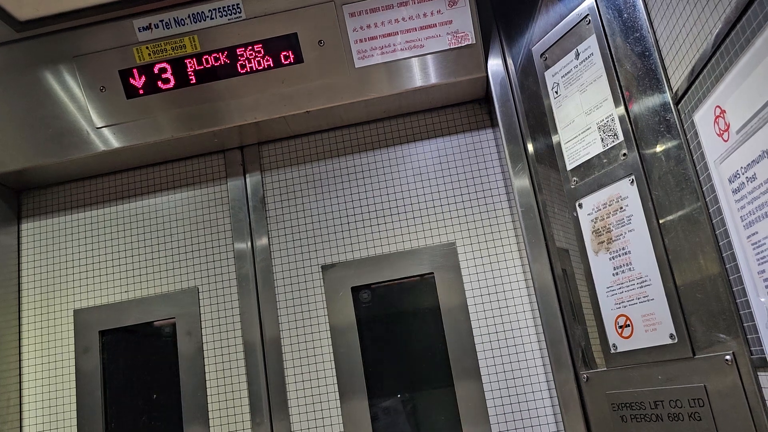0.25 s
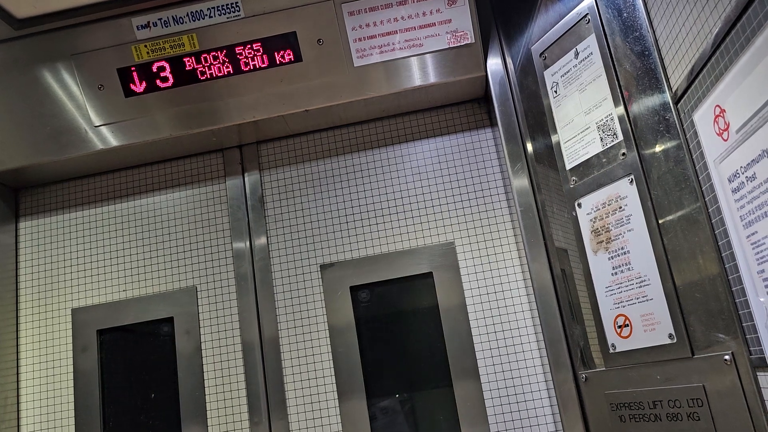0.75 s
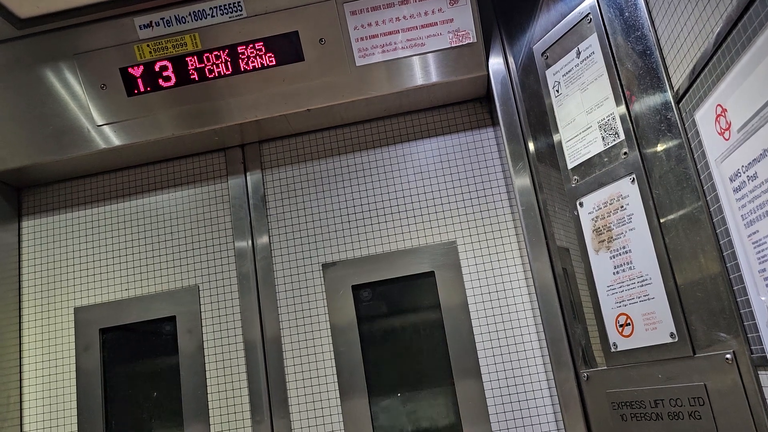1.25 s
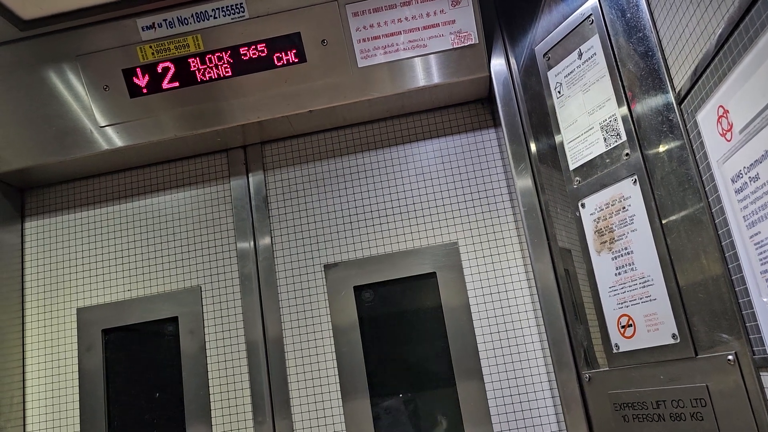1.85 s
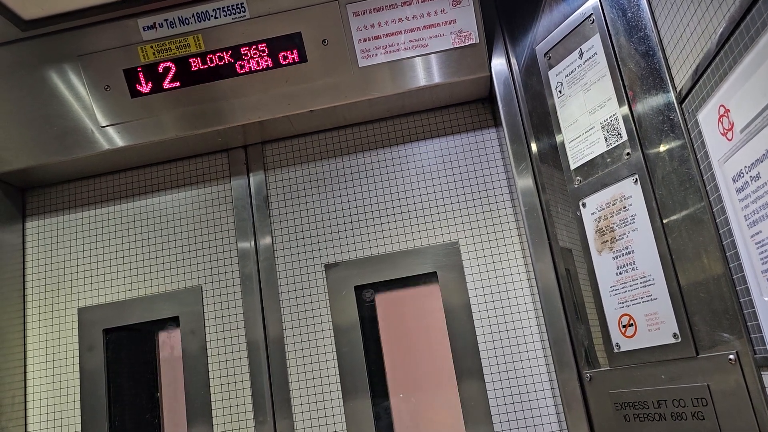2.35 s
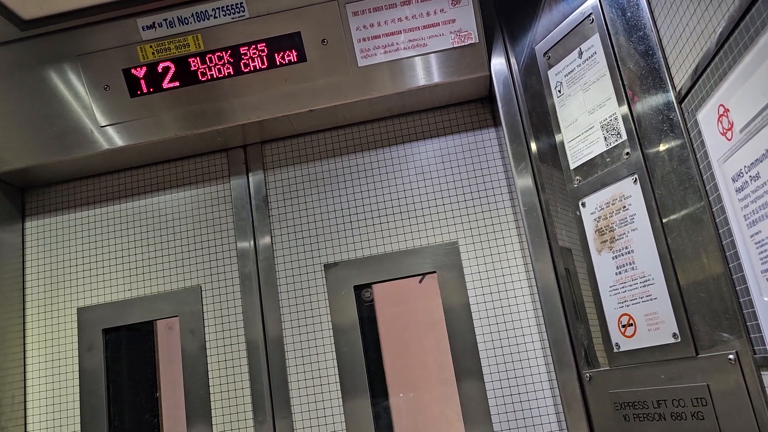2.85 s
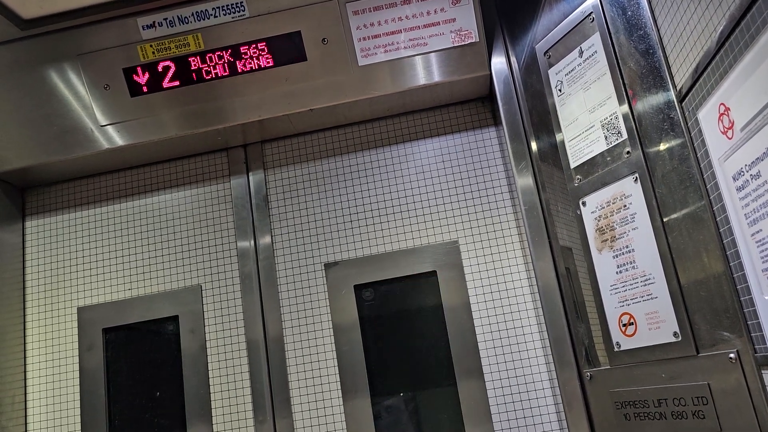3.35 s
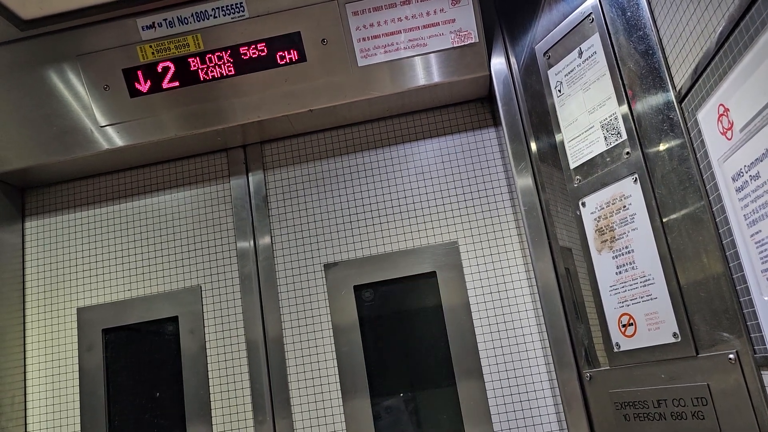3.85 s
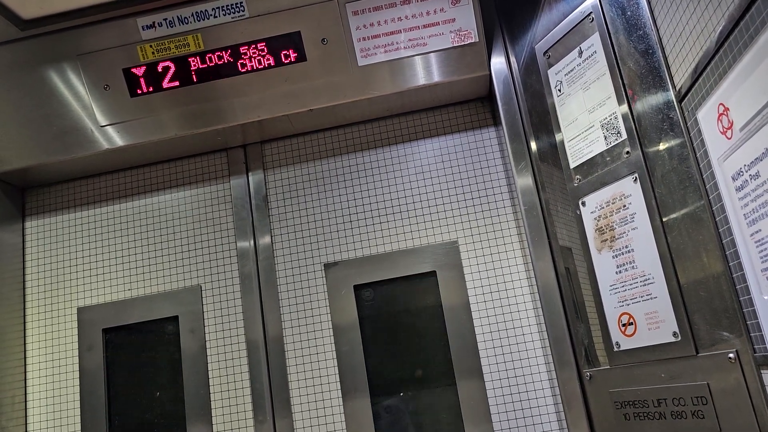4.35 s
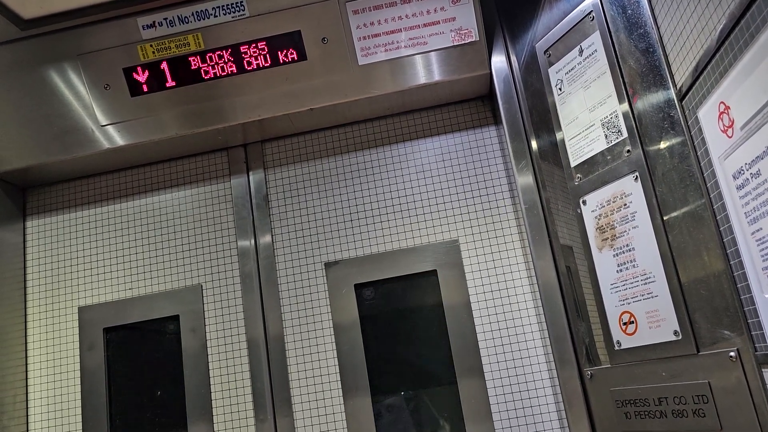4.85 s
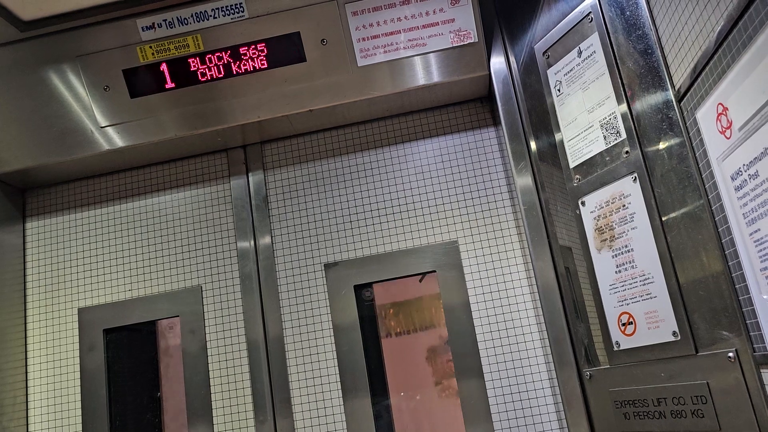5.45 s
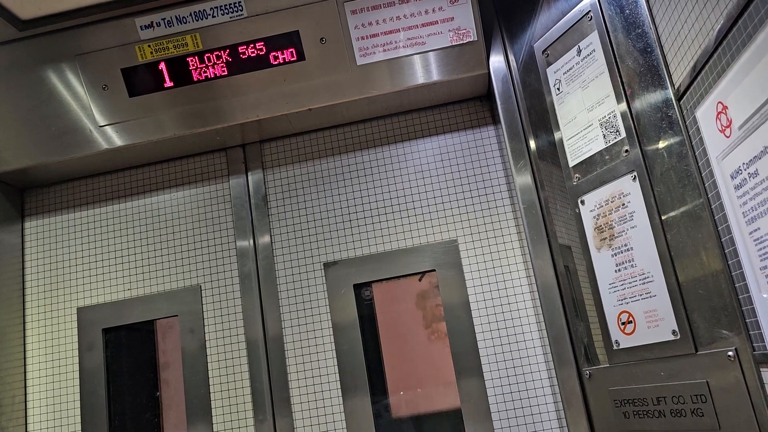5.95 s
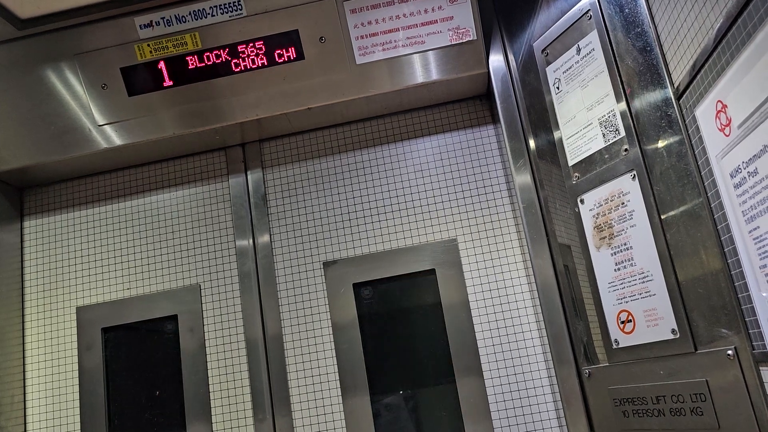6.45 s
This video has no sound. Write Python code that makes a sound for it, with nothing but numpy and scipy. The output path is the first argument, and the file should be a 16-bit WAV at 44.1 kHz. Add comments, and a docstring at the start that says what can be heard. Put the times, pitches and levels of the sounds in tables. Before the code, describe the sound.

Heard inside a small steel passenger lift going down: a steady deep hum with slow throbbing, mains buzz, boxy rumble and a faint fan hiss. A small bright relay tick comes early, then two metallic switch clacks in quick succession, the first louder with a low panel boom. The hum grows stronger, and a very faint high squeal appears near the end. Close, enclosed stereo.

```python
"""Inside a small steel passenger lift on its way down. The winding machine drones through the ropes as beating
sines; the mains hum is a set of even harmonics. Filtered noise gives the ride rumble, ringing in the air modes
of the car, and the hiss of the ceiling fan. A relay ticks, then a shaft switch clacks twice as a landing goes by:
noise bursts with a reverberant decay, the first booming in the panels. Near the bottom a guide shoe starts to
sing faintly, on an unsteady sine."""
import sys
import numpy as np
from scipy import signal
from scipy.fft import rfft, irfft
from scipy.io import wavfile

SR = 44100
rng = np.random.default_rng(int(sys.argv[2]) if len(sys.argv) > 2 else 0)


def put_to_file(sound):
    """Save the sound as 16-bit audio at rate SR, in the file named by the first command-line argument."""
    columns = np.atleast_2d(sound).T  # one column per channel
    safe = np.clip(columns, -1, 1)
    whole_steps = np.round(safe * 32767)
    wavfile.write(sys.argv[1], SR, whole_steps.astype(np.int16))


N = 295470
TIME = np.arange(N) / SR  # s
HZ = np.maximum(np.arange(N // 2 + 1) * SR / N, 1)  # spectrum axis, kept above zero for logarithms
ACROSS = np.array([[1], [-1]])  # opposite signs at left and right

# Densities are mean square per Hz, in dB re full scale squared per Hz.
# Lateral balance of ride and fan noise: f/Hz, left minus right/dB
STEADY_BALANCE = [(60, -0.5), (90, 1.5), (130, 0), (200, 0.5), (300, -5), (440, 0), (660, 2), (990, 0),
                  (1480, -3), (2210, 0), (3300, -1), (4920, 0)]
# Shaft tones, before the load changes them: f/Hz, rms level/dB
SHAFT_TONES = [(22.8, -40.5), (29.4, -42), (45.7, -51), (182.4, -59)]
# Stronger tone of the machine's drone, before its waver: t/s, rms level/dB
DRONE_LEVEL = [(0, -43.5), (2.7, -42), (3.9, -38.5), (5.4, -36.5), (6.7, -37.5)]
# Mains hum, before its waver: multiple of the mains, level in the middle/dB, level across the car/dB
HUM_HARMONICS = [(2, -41, -65), (4, -55, -70), (6, -71.5, -64.5)]
# Broad ride noise, common to both sides and opposed across the car: f/Hz, density/dB
RUMBLE_COMMON = [(15, -80), (20, -57.5), (55, -62), (68, -61), (92, -58.5), (110, -76.5), (230, -78.5),
                 (285, -82.5), (560, -82), (850, -85.5), (960, -89), (1500, -90), (2000, -99.5),
                 (2600, -110)]
RUMBLE_ACROSS = [(15, -84), (90, -81.5), (115, -88.5), (235, -89), (280, -85.5), (640, -87), (1100, -91),
                 (1800, -92), (2200, -100.5), (2800, -112)]
# Standing waves of the car, common and opposed: f/Hz, width/Hz, density at the peak/dB
CAR_MODES = [(130, 14, -66.5), (152.2, 8.9, -59), (170.6, 3.3, -64), (180, 12, -71), (206.5, 9.7, -63),
             (218.5, 7.8, -66.5), (251.6, 10, -67), (269.9, 7.9, -67), (310.4, 19, -72), (377.8, 24, -74),
             (455.7, 17.4, -74.5), (523.8, 13, -74.5), (610, 60, -83), (746.7, 17, -78.5), (798.7, 13, -78),
             (887.4, 15.4, -81), (990, 17, -83.5), (1050, 10.5, -83.5), (1214, 25, -86), (1344, 25, -85),
             (1609, 23, -85)]
CROSS_MODES = [(395, 25, -83), (508, 11, -76.5), (734, 32, -81), (860, 60, -88), (923, 33, -79.5),
               (1230, 18, -79), (1310, 50, -85), (1500, 79, -85), (1730, 17, -96)]
# Vent hiss, before the spectral ripple: f/Hz, density/dB
FAN_HISS = [(800, -115), (2150, -97), (2450, -100.5), (3000, -99), (3500, -104), (4500, -108),
            (5200, -117.5), (6000, -129), (9500, -142), (11500, -132), (12300, -136), (16000, -135)]
# Relay tick, before its envelope: f/Hz, density/dB
RELAY_TICK = [(3000, -130), (5600, -114), (7000, -116), (7900, -105), (9000, -122), (11000, -108),
              (13000, -112), (16000, -121)]
# Landing switch: t/s, relative level/dB, relative level of the low body/dB
CLACKS = [(2.6491, 0.5, -5), (2.9446, -3.5, -13.5)]
# Crack and dull body of a clack, before the relative levels: f/Hz, density/dB
CLACK_CRACK = [(1000, -105), (2600, -92.5), (4200, -87), (6200, -100), (7000, -100), (8700, -102),
               (9600, -109), (11000, -105), (13500, -104), (16000, -110)]
CLACK_BODY = [(130, -69), (300, -59.5), (400, -73), (520, -65.5), (900, -87), (1400, -74), (2000, -87),
              (3000, -100)]
# Ring of the switch lever and its bracket, before the relative levels: f/Hz, width/Hz, density at the peak/dB
LEVER_MODES = [(2090, 150, -82.5), (2694, 250, -80), (3105, 190, -76), (3534, 240, -75), (4370, 200, -84.5),
               (5470, 230, -90), (7600, 400, -100), (11150, 720, -102)]
# Lateral balance of relay and switch: f/Hz, left minus right/dB
SWITCH_BALANCE = [(600, 2), (1800, -1.5), (3300, 2.5), (4200, -3), (5000, 0.5), (6200, 8), (8000, 8.5),
                  (10500, 1), (13500, 5)]
# Reverberation of the car: f/Hz, time to decay by 60 dB/s
CAR_T60 = [(300, 0.56), (1500, 0.82), (3500, 0.44), (7000, 0.26), (15000, 0.26)]

DRONE_HZ, MAINS_HZ, SQUEAL_HZ, CUTOFF_HZ = 58.7, 50, 2676, 15750
# A weaker tone above the drone beats with it; the two are in step at the crest
BEAT_HZ, BEAT_CREST_S, BEAT_TONE_DB = 1.68, 5.24, -7.5
RELAY_S, SWITCH_GAIN_DB = 1.565, 0.06
SQUEAL_START_S, SQUEAL_ATTACK_S, SQUEAL_DB, SQUEAL_FADE_DB_PER_S = 5.55, 0.06, -70, 2
GRIPS_PER_S, GRIP_SWELL_DB, GRIP_SETTLE_S = 5.7, 4.0, 0.9


def from_db(db):
    """Amplitude ratio: a level of 20 dB is a factor of ten."""
    return 10 ** (np.asarray(db) / 20)


def at_hz(points, hz):
    """Logarithmic pitch scale: interpolate a table against log frequency."""
    f, value = np.transpose(points)
    return np.interp(np.log(hz), np.log(f), value)


def colour(spectrum, modes=()):
    """Power addition: resonances stand on a broad slope, which falls 40 dB per octave past its ends."""
    octaves_outside = np.abs(np.log2(HZ / np.clip(HZ, spectrum[0][0], spectrum[-1][0])))
    power = from_db(at_hz(spectrum, HZ) - 40 * octaves_outside) ** 2
    for hz, width, db in modes:
        detuning = (HZ - hz) / width
        power = power + from_db(db) ** 2 / (1 + 2 * detuning ** 2) ** 2
    return np.sqrt(power)


def noise(gain):
    """Spectral shaping: white noise filtered to the given amplitude per root Hz."""
    return irfft(rfft(rng.standard_normal(N)) * gain, N) * np.sqrt(SR / 2)


def drift(rate_hz):
    """Slow random fluctuation: low-passed noise scaled to a standard deviation of 1."""
    slow = noise(1 / (1 + (HZ / rate_hz) ** 2) * (HZ > 1))
    return slow / np.std(slow)


def tone(hz, waver_db, wander_hz, rate_hz=3):
    """Random modulation: a sine of nominal rms 1 wavers in level and wanders in pitch."""
    turns = np.cumsum(hz + wander_hz * drift(rate_hz)) / SR + rng.random()
    return np.sqrt(2) * np.sin(2 * np.pi * turns) * from_db(waver_db * drift(rate_hz))


def beating_pair(waver_db, wander_hz, rate_hz=3):
    """Beats: two close tones, wandering together, reinforce and oppose each other in turn."""
    turns = np.cumsum(DRONE_HZ + wander_hz * drift(rate_hz)) / SR + rng.random()
    lead = BEAT_HZ * (TIME - BEAT_CREST_S)
    drone = np.sin(2 * np.pi * turns)
    neighbour = from_db(BEAT_TONE_DB) * np.sin(2 * np.pi * (turns + lead))
    return np.sqrt(2) * (drone + neighbour) * from_db(waver_db * drift(rate_hz))


def off_centre(x, balance):
    """Level difference between the sides: a sound favours left or right according to frequency."""
    return irfft(rfft(x) * from_db(ACROSS * at_hz(balance, HZ) / 2), N)


def strike(s, gain, rise_s, hold_s, grain_db=1.0):
    """Reverberation: a knock's uneven echoes pile up, hold, then decay at a rate set by frequency."""
    start, size = int(s * SR), SR // 2
    age = np.arange(size) / SR
    sides = [(noise(gain) * from_db(grain_db * drift(250)))[:size] for _ in range(2)]
    echoes = rfft(sides)
    hz = np.maximum(np.arange(echoes.shape[1]) * SR / size, 1)
    out = np.zeros((2, N))
    for centre, t60 in CAR_T60:
        # each band fades into its neighbours, so that the shares add to 1
        share = at_hz([(f, float(f == centre)) for f, _ in CAR_T60], hz)
        decay = from_db(-60 * np.maximum(age - hold_s, 0) / t60)
        envelope = np.minimum(age / rise_s, 1) * decay
        out[:, start:start + size] += irfft(echoes * share, size) * envelope
    return out


def machine():
    """Structure-borne sound: shaft tones and a beating drone come down the ropes, growing on the descent."""
    drone_db = np.interp(TIME, *np.transpose(DRONE_LEVEL))
    shafts = sum(from_db(db) * tone(hz, waver_db=0.6, wander_hz=0.31) for hz, db in SHAFT_TONES)
    # the shaft tones follow the drone's level, but much less strongly
    load = from_db(0.19 * (drone_db - np.mean(drone_db)))
    return shafts * load + from_db(drone_db) * beating_pair(waver_db=1.0, wander_hz=0.31)


def mains_hum():
    """Magnetic hum: fan motor and lamp chokes sound at even multiples of the mains frequency."""
    hum = 0
    for multiple, middle_db, across_db in HUM_HARMONICS:
        sides = from_db(middle_db) + ACROSS * from_db(across_db)
        hum = hum + sides * tone(multiple * MAINS_HZ, waver_db=0.85, wander_hz=0.014)
    return hum


def ride_noise(surge_db=0.5):
    """Room resonance: rolling and rushing air excite the car's standing waves, with only slight surges."""
    common = noise(colour(RUMBLE_COMMON, CAR_MODES))
    across = ACROSS * noise(colour(RUMBLE_ACROSS, CROSS_MODES))
    return (common + across) * from_db(surge_db * drift(1.5))


def fan(ripple_db=1.57, ripple_hz=90):
    """Diffuse field: vent hiss arrives from all round, its spectrum rippled by the close steel walls."""
    grid = np.arange(0, SR / 2, ripple_hz)
    ripple = from_db(ripple_db * np.interp(HZ, grid, rng.standard_normal(len(grid))))
    gain = colour(FAN_HISS) * ripple
    return noise(gain) + ACROSS * noise(gain) * from_db(-0.6)


def relay_tick():
    """Impulsive excitation: a small relay ticks, a short bright burst scattered by the walls."""
    tick = strike(RELAY_S, colour(RELAY_TICK), rise_s=0.0018, hold_s=0.012)
    return off_centre(tick, SWITCH_BALANCE) * from_db(SWITCH_GAIN_DB)


def landing_switch(snap_db=-3.0, snap_s=0.0044):
    """Direct and reverberant sound: a lever snaps on and off a landing cam, and the walls scatter it."""
    lever, body = colour(CLACK_CRACK, LEVER_MODES), colour(CLACK_BODY)
    scattered, snaps = 0, 0
    for s, db, body_db in CLACKS:
        gain = lever + from_db(body_db) * body
        scattered = scattered + from_db(db) * strike(s, gain, rise_s=0.0048, hold_s=0.037)
        age = np.maximum(TIME - s, 0) / snap_s
        snaps = snaps + from_db(db + snap_db) * age * np.exp(1 - age)  # each peaks after snap_s
    direct = noise(lever) * snaps
    return off_centre(scattered + direct, SWITCH_BALANCE) * from_db(SWITCH_GAIN_DB)


def panel_boom(level_db=-37, t60=0.54, swell_s=0.035):
    """Modal vibration: the first clack shakes two low modes of the wall panels, which swell and die."""
    age = np.maximum(TIME - CLACKS[0][0], 0)
    modes = tone(141, waver_db=4.0, wander_hz=2.2) + tone(173, waver_db=3.4, wander_hz=2.3)
    return from_db(level_db - 60 * age / t60) * (1 - np.exp(-age / swell_s)) * modes


def guide_shoe():
    """Stick-slip friction: the shoe sings on the rail, swelling as it grips and sinking as it slips."""
    age = np.maximum(TIME - SQUEAL_START_S, 0)
    onset = np.minimum(age / SQUEAL_ATTACK_S, 1)
    # the swells settle as the shoe slides on
    grip = -np.cos(2 * np.pi * GRIPS_PER_S * age) * np.exp(-age / GRIP_SETTLE_S)
    level_db = SQUEAL_DB + GRIP_SWELL_DB * grip - SQUEAL_FADE_DB_PER_S * age
    note = tone(SQUEAL_HZ, waver_db=4.0, wander_hz=11.0, rate_hz=35)
    reflected = tone(SQUEAL_HZ, waver_db=1.0, wander_hz=14, rate_hz=25)
    return onset * from_db(level_db) * (note + from_db(-1.5) * ACROSS * reflected)


def scene():
    """Superposition: everything heard inside the car is the sum of its sources."""
    steady = machine() + mains_hum() + off_centre(ride_noise() + fan(), STEADY_BALANCE)
    return steady + relay_tick() + landing_switch() + panel_boom() + guide_shoe()


def record(dry):
    """Band limiting: both ends are eased over a millisecond and a steep low-pass cuts the top."""
    ease = np.minimum(np.minimum(TIME, TIME[::-1]) / 0.001, 1)
    low_pass = signal.ellip(10, 0.1, 80, CUTOFF_HZ, fs=SR, output="sos")
    return signal.sosfilt(low_pass, dry * ease)


dry = scene()
out = record(dry)
put_to_file(out)
```